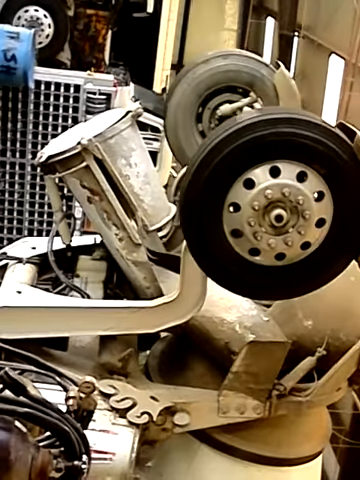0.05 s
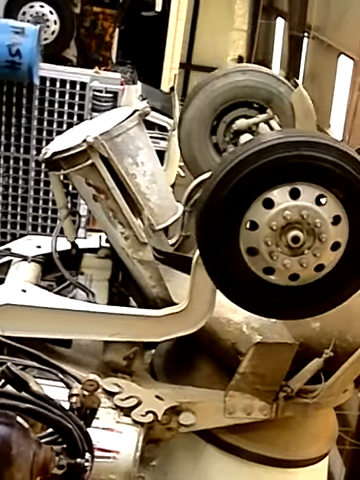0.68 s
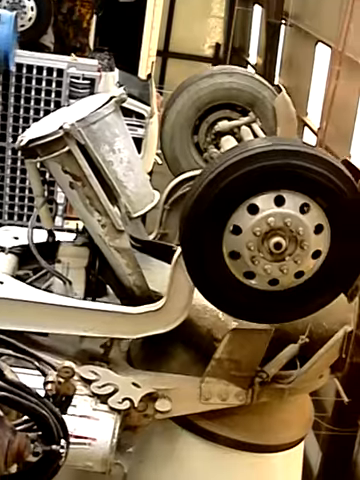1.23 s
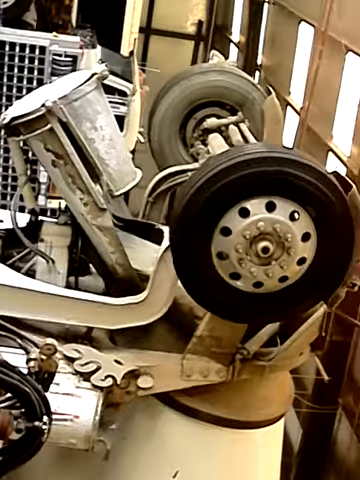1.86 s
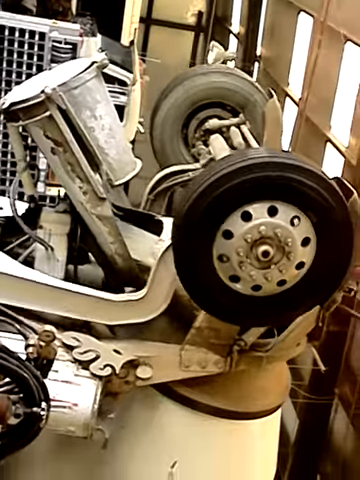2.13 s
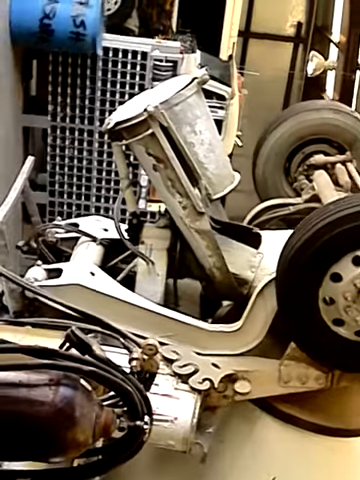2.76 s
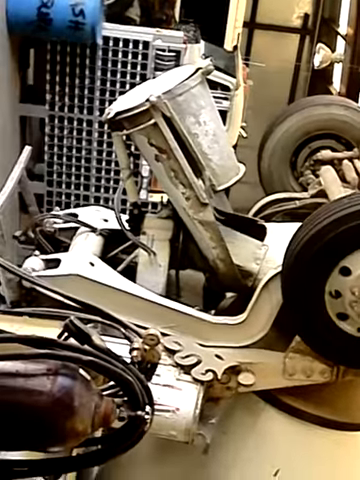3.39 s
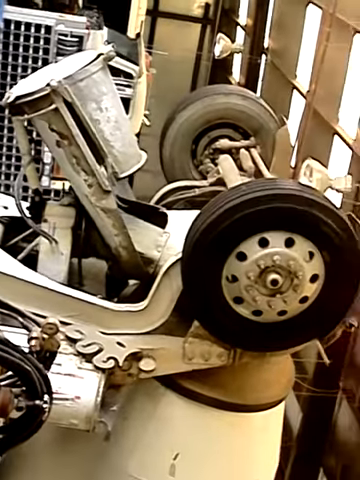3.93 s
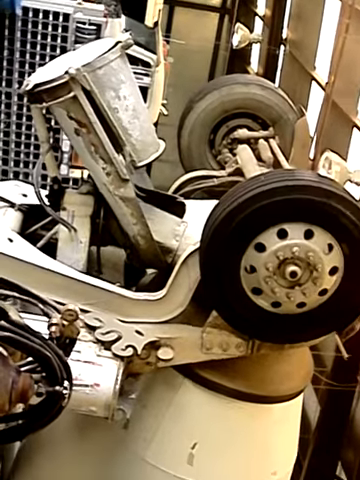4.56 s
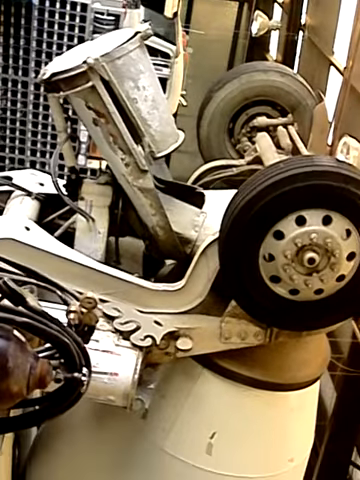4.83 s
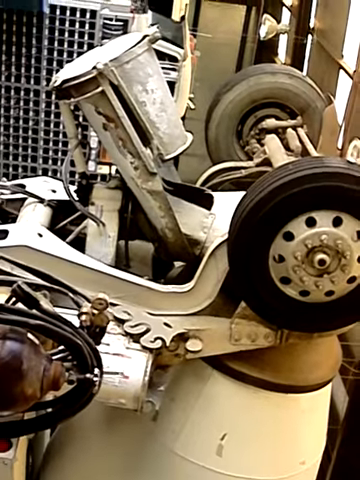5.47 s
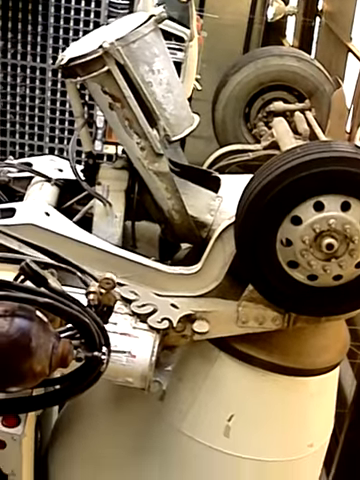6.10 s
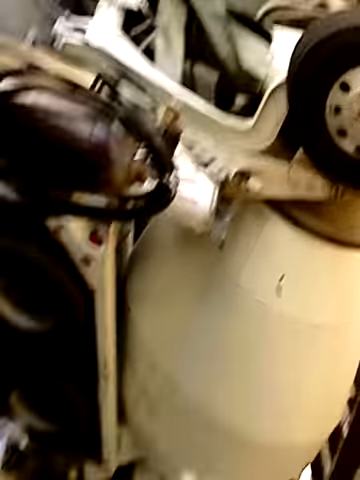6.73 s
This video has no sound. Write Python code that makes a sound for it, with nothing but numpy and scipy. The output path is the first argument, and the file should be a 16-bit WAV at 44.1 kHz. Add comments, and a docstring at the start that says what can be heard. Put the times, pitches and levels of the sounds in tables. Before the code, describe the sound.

Over a truck's low idling rumble and thumping wind gusts, an air valve hisses, bursts into a roar and sputters out.

```python
"""In a yard, a mixer truck idles while its lift axle lets off air. A valve opens with a short whistle
and the hiss of a turbulent jet; then the dump valve bursts open and the air springs roar empty through
a resonant passage, pulsed by the compressor, ending in a sputter and a rising whistle. The air, brief
squeaks and swells of the engine's whine reverberate in the yard. Throughout, gusts of wind thump on the
phone's microphone, which overloads with a click under the hardest thump."""
import sys
import numpy as np
from scipy import signal
from scipy.fft import rfft, irfft, next_fast_len
from scipy.io import wavfile
from scipy.ndimage import uniform_filter1d, minimum_filter1d

SR = 44100
rng = np.random.default_rng(int(sys.argv[2]) if len(sys.argv) > 2 else 0)


def output_pcm(signal):
    """Save a mono or channel-first signal as 16-bit PCM at the path in sys.argv[1].

    Samples are clipped to [-1, 1] before scaling.
    """
    pcm = np.clip(np.atleast_2d(signal).T, -1, 1) * 32767
    wavfile.write(sys.argv[1], SR, np.round(pcm).astype(np.int16))


N = 297234
TIME = np.arange(N) / SR
FREQS = np.maximum(np.arange(8193) * SR / 16384, 1)

# the bleed opens and chokes, the dump valve opens, the springs run empty, the valve shuts
BLEED_S, CHOKE_S, DUMP_S, EMPTY_S, SHUT_S = 2.508, 2.82, 2.94, 3.671, 4.262

# spectra of the engine's rumble and faint hiss: (frequency [Hz], relative level [dB])
RUMBLE_SPECTRUM = [(25, -8), (60, -15), (110, -4), (225, -5.5), (400, -6), (600, -4.5), (750, -5.5),
                   (1000, -6.5), (1500, -9.5), (2200, -13.5), (3000, -20), (4000, -26), (4700, -33.5),
                   (6000, -36.5)]
IDLE_HISS_SPECTRUM = [(5500, -39), (6200, -14), (6800, -1.5), (7300, -0.5), (8200, -7), (9300, -13.5),
                      (10500, -21.5), (15500, -27)]
# tones of the idling engine: (frequency [Hz], bandwidth [Hz], level [dB])
ENGINE_WHINES = [(231, 23, -56), (318.3, 3.8, -57), (595, 26, -55), (952, 21, -52.5), (1540, 25, -68.5),
                 (2194, 25, -69), (5180, 160, -76.5)]
# gusts at the microphone: (time [s], half length [s], level [dB], upper edge [Hz])
WIND_GUSTS = [(0.112, 0.032, -34, 400), (.613, 0.011, -21.5, 1580), (0.663, 0.025, -18, 700),
              (0.683, 0.0052, -11.5, 1160), (0.703, 0.017, -12, 1000), (0.728, 0.0048, -8, 1470),
              (0.765, 0.03, -20, 750), (0.825, 0.037, -34.5, 385), (1.552, 0.05, -26, 300),
              (1.655, 0.04, -26, 392), (2.231, 0.026, -34, 326), (3.133, 0.056, -23, 258),
              (3.87, 0.057, -22.5, 390), (4.059, 0.038, -20.5, 395), (6.641, 0.018, -38, 285)]
# eddies that thump the microphone: (time [s], peak level [dB], frequency [Hz], time scale [s])
WIND_EDDIES = [(0.073, -9, 346, 0.003), (.603, -6.5, 541.6, 0.0064), (0.684, 0, 313.3, 0.0024),
               (0.72, 1, 430, 0.0012), (0.781, -8.5, 503, 0.0034), (0.792, -8, 247, 0.0028),
               (1.551, -12.5, 210.5, 0.0074), (3.639, -9.5, 335, 0.0034), (3.842, -11, 294, 0.0069),
               (3.934, -10, 274.6, 0.0062), (4.064, -7.5, 276, 0.0058), (4.538, -10.5, 284, 0.0047),
               (4.855, -19, 196, 0.0063), (5.122, -25.5, 215.6, 0.01), (6.077, -2, 450, 0.0038),
               (6.085, -13.5, 311.4, 0.0042)]
# brief swells of the idling engine's whine (950-960 Hz), the click of the microphone overloading under
# the hardest wind thump (0.72 s) and, in the other rows, squeaks, hoots and spits of air:
# (time [s], half length [s], level [dB], frequency [Hz], nominal bandwidth [Hz])
BRIEF_SOUNDS = [(0.273, 0.019, -38, 958, 60), (0.687, 0.011, -51.5, 3350, 350),
                (0.72, 0.00049, -24, 2200, 3000), (0.751, 0.038, -39.5, 1600, 260),
                (0.881, 0.031, -43, 960, 70), (2.16, 0.023, -51, 3330, 350), (2.586, 0.028, -36, 720, 200),
                (2.676, 0.054, -30.5, 530, 219), (2.838, 0.035, -32, 530, 110),
                (3.795, 0.023, -24, 1500, 705), (3.959, .05, -51.5, 6120, 120),
                (4.162, .007, -35, 2050, 600), (4.219, 0.038, -46, 4370, 200),
                (4.572, 0.028, -54, 3800, 3000), (5.368, 0.039, -39, 950, 90)]
# echoes from chassis, tank and ground: (delay [s], level relative to the direct sound [dB])
NEAR_REFLECTIONS = [(.0027, -24), (.0063, -20.5), (0.0135, -14.5), (.027, -15)]
# whistles, falling as the valve opens and rising as the pressure runs out:
# (time [s], frequency [Hz], level [dB])
FALLING_WHISTLE = [(2.49, 1221, -39), (2.535, 1180, -24.5), (2.59, 1130, -29), (2.65, 1054, -38.5),
                   (2.7, 970, -50)]
RISING_WHISTLE = [(3.9, 477, -27), (3.97, 506.4, -29), (4.03, 557.4, -32), (4.08, 683, -29),
                  (4.13, 794, -35.5), (4.19, 843, -43)]
# spectra of air at the valve seat, narrow bleed and wide dump: (frequency [Hz], relative level [dB])
SEAT_SPECTRUM = [(4500, -8), (6000, -16), (6600, -5.5), (7400, 0), (8300, -6), (9300, -6), (10800, -21),
                 (13000, -21.5), (15500, -23)]
BLEED_SPECTRUM = [(700, -13), (1000, -8), (1280, 0), (1600, -5.5), (1850, 0), (2300, -1), (2680, -3.5),
                  (3070, -1.5), (3700, -7), (4400, -8), (4880, -16), (5500, -13.5), (6400, -23.5),
                  (7500, -36)]
DUMP_SPECTRUM = [(700, -19), (900, 1), (1060, -19.5), (1280, 6), (1600, -4.5), (2330, 1.5), (2680, -2.5),
                 (3070, -3.5), (4000, -7.5), (4500, -11), (4880, -15.5), (5600, -15), (6400, -22),
                 (7500, -36)]
# resonances of the dump valve's bark and of the exhaust passage:
# (frequency [Hz], bandwidth [Hz], relative level [dB])
BARK_MODES = [(200, 160, -11.5), (371, 112, -5), (699.3, 28, 0.5), (978, 170, -0.5), (1188, 36, 1.5),
              (1330, 360, -5), (1970, 460, -16)]
PASSAGE_MODES = [(176, 163, -2.5), (510, 205, 4.5), (807, 52, 3.5), (1270, 350, -8.5), (1606, 71, -6),
                 (1845, 71, -5), (2190, 160, -17), (2990, 99, -13.5), (3440, 98, -22.5), (4500, 170, -41),
                 (6100, 180, -32)]


def undb(db):
    """Amplitude ratio of a level: tenfold for every 20 dB."""
    return 10 ** (np.asarray(db) / 20)


def add(out, time_s, x):
    """Superposition: mixes x into out, centred on time_s."""
    start = int(time_s * SR) - len(x) // 2
    lo, hi = max(start, 0), min(start + len(x), N)
    out[lo:hi] += x[lo - start:hi - start]


def wander(rate, size=N):
    """Band-limited fluctuation of spread near 1, through rate random values a second."""
    steps = signal.resample_poly(rng.standard_normal(1024), 8, 1)
    return np.interp(TIME[:size] * rate * 8, np.arange(len(steps)), steps)


def flutter(rate, depth_db):
    """Random modulation: a factor that wanders around 1."""
    return undb(depth_db * wander(rate))


def noise(gain, size=N):
    """Spectral shaping: white noise weighted by a gain at each of FREQS, scaled to rms 1."""
    n = next_fast_len(size, real=True)
    gain = np.interp(np.arange(n // 2 + 1) * SR / n, FREQS, gain)
    x = irfft(rfft(rng.standard_normal(n)) * gain, n)[:size]
    return x / x.std()


def spectrum(points):
    """Spectral envelope through the points, falling 36 dB an octave beyond the ends."""
    hz, db = np.transpose(points)
    octaves_outside = np.abs(np.log2(FREQS / np.clip(FREQS, hz[0], hz[-1])))
    return undb(np.interp(np.log(FREQS), np.log(hz), db) - 36 * octaves_outside)


def resonance(hz, width_hz):
    """Response of two equal resonators in cascade, with half-power bandwidth width_hz."""
    return 1 / (1 + ((FREQS - hz ** 2 / FREQS) / (1.55 * width_hz)) ** 2)


def modal_response(modes):
    """Incoherent summation: the resonances add in power."""
    return np.sqrt(sum((undb(db) * resonance(hz, width)) ** 2 for hz, width, db in modes))


def swell(gain, half_s, db, size=12288):
    """Gaussian windowing: shaped noise swells to an rms level of db and fades again."""
    window = np.exp(-((TIME[:size] - TIME[size // 2]) / half_s) ** 2)
    burst = noise(gain, size) * window
    return undb(db) * burst * np.sqrt(np.sum(window ** 2) / np.sum(burst ** 2))


def yard(x, t60_s=3.8, build_s=0.056, low_hz=500, high_hz=5000):
    """Reverberation: diffuse echoes from trucks and walls decay; air absorption takes off the treble."""
    tail = noise(FREQS / (FREQS + low_hz) / np.sqrt(1 + (FREQS / high_hz) ** 4))
    tail *= np.exp(-np.log(1000) * TIME / t60_s) * np.minimum(TIME / build_s, 1)
    return signal.fftconvolve(x, tail / np.sqrt(np.sum(tail ** 2)))[:N]


def engine(firing_hz=40.1, knock=0.14, rumble_db=-44.5, hiss_db=-65):
    """Amplitude modulation: the diesel's firings throb in its rumble, beside whines and a faint hiss."""
    firings = np.cumsum(firing_hz * flutter(rate=3.6, depth_db=-0.2)) / SR
    throb = 1 + knock * np.cos(2 * np.pi * firings)
    rumble = undb(rumble_db) * noise(spectrum(RUMBLE_SPECTRUM)) * throb * flutter(rate=10, depth_db=1.1)
    whines = sum(undb(db) * noise(resonance(hz, width)) * flutter(rate=8.3, depth_db=2.5)
                 for hz, width, db in ENGINE_WHINES)
    return rumble + whines + undb(hiss_db) * noise(spectrum(IDLE_HISS_SPECTRUM))


def turbulence(edge_hz, low_cut_hz=85, knee=0.89):
    """Turbulent spectrum: faster air carries smaller eddies, and above the edge they die out steeply."""
    low_cut = 1 / np.hypot(1, (low_cut_hz / FREQS) ** 3)
    return low_cut / np.hypot(1, FREQS / (knee * edge_hz)) / np.hypot(1, (FREQS / edge_hz) ** 6)


def eddy(hz, scale_s, rise=3.65, fall=1.5, wobble_rad=0.7, size=8192):
    """Pressure transient of one eddy: a few uneven swings that build fast and die more slowly."""
    age = TIME[:size] - TIME[size // 2]
    envelope = 1 / (np.exp(-rise * age / scale_s) + np.exp(fall * age / scale_s))
    phase = 2 * np.pi * (hz * age + rng.random()) + wobble_rad * wander(hz, size)
    return envelope / envelope.max() * np.cos(phase)


def wake(hz, wake_db=-14.0, build_s=0.003, decay_s=0.02, size=16384):
    """Turbulent wake: churn on either side of an eddy's pitch builds around it and dies behind it."""
    age = TIME[:size] - TIME[size // 2]
    churn = noise(turbulence(edge_hz=1.48 * hz, low_cut_hz=0.42 * hz), size)
    return undb(wake_db) * churn * np.exp(np.minimum(age / build_s, -age / decay_s))


def wind(breeze_db=-55, freshen_s=4.1, puffs_per_s=3.7, puff_db=-41, puff_spread_db=4.0):
    """Pseudo-sound: the pressure of breeze, gusts, eddies and late puffs acts on the microphone port."""
    out = undb(breeze_db) * noise(resonance(hz=148, width_hz=300))
    for time_s, half_s, db, edge_hz in WIND_GUSTS:
        add(out, time_s, swell(turbulence(edge_hz), half_s, db))
    for time_s, db, hz, scale_s in WIND_EDDIES:
        add(out, time_s, undb(db) * eddy(hz, scale_s))
        add(out, time_s, undb(db) * wake(hz))
    for k, (jitter, strength) in enumerate(rng.uniform(-1, 1, size=(8, 2))):
        puff = swell(turbulence(edge_hz=290), half_s=0.064, db=puff_db + puff_spread_db * strength)
        add(out, freshen_s + (k + jitter / 2) / puffs_per_s, puff)
    return out


def brief_sounds(steepness=2.45):
    """Band-limited bursts: narrow bands sound as whines and squeaks, wide ones as a click or spits."""
    out = np.zeros(N)
    for time_s, half_s, db, hz, width in BRIEF_SOUNDS:
        add(out, time_s, swell(resonance(hz, width) ** steepness, half_s, db))
    return out


def chassis(x, sway=0.0209):
    """Comb filtering: close reflections interfere with the sound; the paths shift as the phone sways."""
    stretch = 1 + sway * wander(rate=1.5)
    echoes = sum(undb(db) * np.interp(TIME - delay * stretch, TIME, x) for delay, db in NEAR_REFLECTIONS)
    return (x + echoes) / np.sqrt(1 + sum(undb(db) ** 2 for _, db in NEAR_REFLECTIONS))


def flow(start_s, attack_s, end_s, release_s):
    """Amplitude envelope of a stream of air: it opens, holds and decays exponentially."""
    opening = (1 + np.tanh((TIME - start_s) / attack_s)) / 2
    return opening * np.exp(-np.maximum(TIME - end_s, 0) / release_s)


def dump_flow(surge_db, end_s, release_s, relax_s=0.093):
    """Pressure relaxation: a sudden surge settles to a steady flow, which dies as the springs empty."""
    surge = undb(surge_db * np.exp(-np.maximum(TIME - DUMP_S, 0) / relax_s))
    return surge * flow(DUMP_S, 0.001, end_s, release_s)


def compressor(depth_db, rate_at_shut_hz=19.1, sag_hz_per_s=0.44, waver_cycles=0.04):
    """Periodic modulation: a gain that throbs with the compressor's gradually slowing strokes."""
    left_s = SHUT_S - TIME
    cycles = rate_at_shut_hz * left_s + sag_hz_per_s * left_s ** 2 / 2 + waver_cycles * wander(rate=6)
    return undb(depth_db * np.cos(2 * np.pi * cycles))


def whistle(rows, width_hz=160, fade_s=0.018):
    """Narrow-band turbulence: two random signals in quadrature make a breathy, gliding tone."""
    times, hz, db = np.transpose(rows)
    phase = 2 * np.pi * np.cumsum(np.interp(TIME, times, hz)) / SR
    tone = wander(width_hz) * np.cos(phase) + wander(width_hz) * np.sin(phase)
    outside_s = np.abs(TIME - np.clip(TIME, times[0], times[-1]))
    return tone * undb(np.interp(TIME, times, db)) * np.exp(-outside_s / fade_s)


def valve_seat(seat_db=-44.0, lead_s=0.031, dip_db=-3):
    """Orifice noise: a thin hiss leads the jet, dips as the bleed chokes and ends as the valve shuts."""
    dip = undb(dip_db * flow(CHOKE_S, attack_s=0.05, end_s=DUMP_S, release_s=0.02))
    leak = flow(BLEED_S - lead_s, attack_s=0.034, end_s=SHUT_S, release_s=0.05)
    gain = undb(seat_db) * leak * dip * compressor(depth_db=0.6)
    return gain * noise(spectrum(SEAT_SPECTRUM)) * flutter(rate=110, depth_db=1.7)


def dump_valve(bark_db=-7, bark_decay_s=0.14, edge_hz=4200, click_db=-8, click_decay_s=0.002):
    """Transient excitation: the valve snaps open with a click; a resonant bark dies with the pressure."""
    age = np.maximum(TIME - DUMP_S, 0)
    low_pass = 1 / np.hypot(1, (FREQS / edge_hz) ** 4)
    bark = noise(modal_response(BARK_MODES) * low_pass)
    bark *= np.minimum(age / 0.0023, 1) * np.exp(-age / bark_decay_s)
    click = noise(resonance(hz=5800, width_hz=2000) ** 2)
    click *= np.minimum(age / 0.0016, 1) * np.exp(-age / click_decay_s)
    return undb(bark_db) * bark + undb(click_db) * click


def hollow(x, first_hz=1440, settled_hz=1050, settle_s=2.645, glide_s=0.03, width_hz=330):
    """Cancellation: subtracting part of a band cuts a notch that glides down as the jet gets going."""
    hz = settled_hz + (first_hz - settled_hz) * (1 - np.tanh((TIME - settle_s) / glide_s)) / 2
    carrier = np.exp(2j * np.pi * np.cumsum(hz) / SR)
    size = int(SR / width_hz / 2)
    # shift the band to 0 Hz, isolate it by smoothing, shift it back
    band = uniform_filter1d(uniform_filter1d(x / carrier, size), size) * carrier
    depth = np.clip(0.47 + 0.095 * wander(rate=4.96), 0, 1)
    return x - depth * 2 * band.real


def passage_roar(bleed_db=-39, dump_db=-21.0, lag_s=0.046):
    """Forced resonance: the escaping air drives the modes of the exhaust passage."""
    bleed = undb(bleed_db) * flow(BLEED_S, attack_s=0.054, end_s=DUMP_S, release_s=0.03)
    dump = undb(dump_db) * dump_flow(surge_db=4.5, end_s=EMPTY_S + lag_s, release_s=0.24)
    roar = noise(modal_response(PASSAGE_MODES)) * flutter(rate=40, depth_db=2.0)
    return (bleed + dump) * roar * compressor(depth_db=1.0)


def sputter(ring_db=-39.0, hiss_db=-43):
    """Modal ringing: the nearly spent jet pulses, and each upper passage mode flares up on its own."""
    ring = sum(noise(resonance(hz, width)) * undb(db) * np.sqrt(width) * flutter(rate=20, depth_db=3.5)
               for hz, width, db in PASSAGE_MODES[3:])
    spent = undb(ring_db) * ring / ring.std() + undb(hiss_db) * noise(spectrum(DUMP_SPECTRUM))
    return spent * flow(EMPTY_S, attack_s=0.06, end_s=SHUT_S, release_s=0.032) * compressor(depth_db=6.5)


def air_jet(bleed_db=-18.5, sag_db_per_s=12, dump_db=-21.5):
    """Turbulent jet noise: air hisses through the bleed, then the dump valve, and sputters out."""
    sag_db = sag_db_per_s * np.maximum(TIME - BLEED_S, 0)
    bleed = undb(bleed_db - sag_db) * flow(BLEED_S, attack_s=0.026, end_s=CHOKE_S, release_s=0.16)
    dump = undb(dump_db) * dump_flow(surge_db=7.5, end_s=EMPTY_S, release_s=0.08)
    hiss = bleed * noise(spectrum(BLEED_SPECTRUM)) + dump * noise(spectrum(DUMP_SPECTRUM))
    return (sputter() + hiss * compressor(depth_db=1.26)) * flutter(rate=46, depth_db=2.0)


def scene(yard_db=-21.5):
    """Superposition: air and brief sounds echo over the engine; the wind is right at the microphone."""
    air = hollow(passage_roar() + air_jet()) + valve_seat()
    whistles = whistle(FALLING_WHISTLE) + whistle(RISING_WHISTLE)
    direct = chassis(air + whistles + dump_valve()) + brief_sounds()
    return (direct + undb(yard_db) * yard(direct) + engine() + wind())[None]


def record(dry, low_cut_hz=48, top_hz=15450):
    """Band and peak limiting: the phone thins the deep bass, holds down peaks and cuts the top."""
    x = signal.sosfilt(signal.butter(2, low_cut_hz, "highpass", fs=SR, output="sos"), dry)
    gain = minimum_filter1d(1 / np.maximum(np.abs(x), 1), size=61)
    gain = uniform_filter1d(uniform_filter1d(gain, size=31), size=31)
    return signal.sosfilt(signal.ellip(10, 0.1, 80, top_hz, fs=SR, output="sos"), x * gain)


dry = scene()
out = record(dry)
output_pcm(out)
```